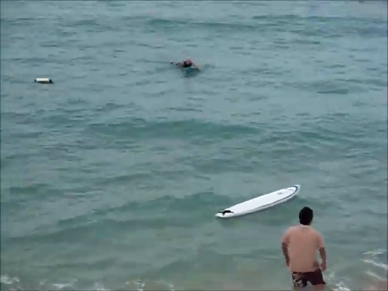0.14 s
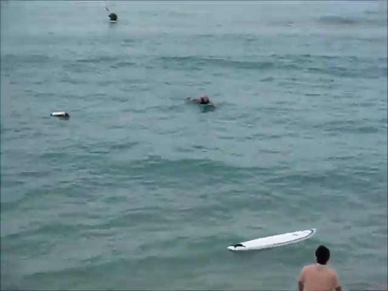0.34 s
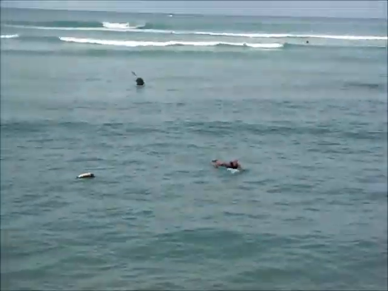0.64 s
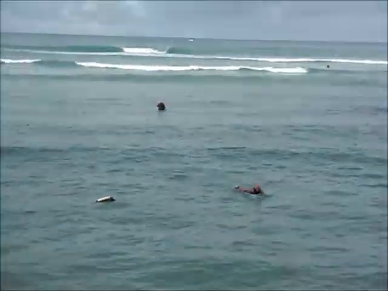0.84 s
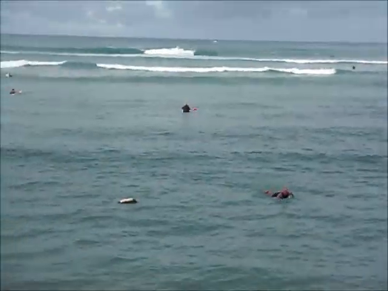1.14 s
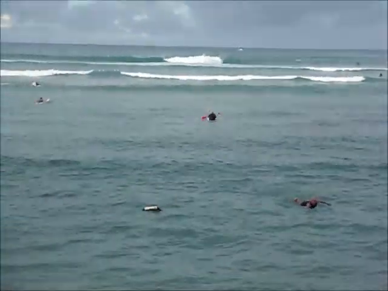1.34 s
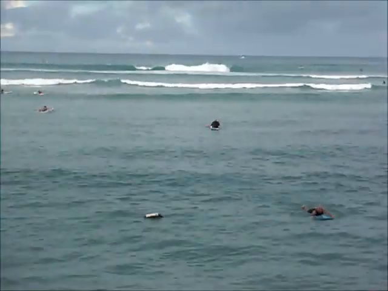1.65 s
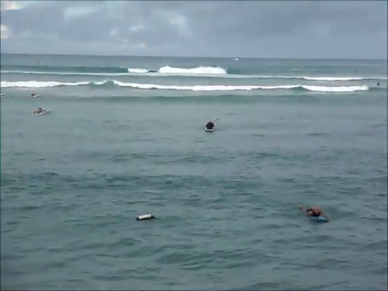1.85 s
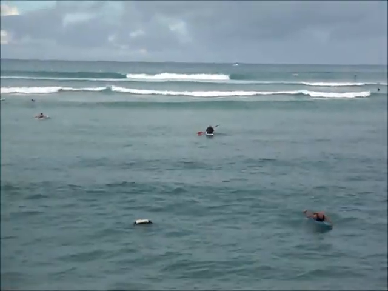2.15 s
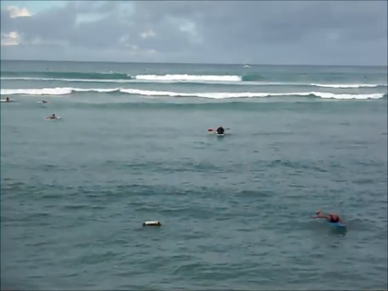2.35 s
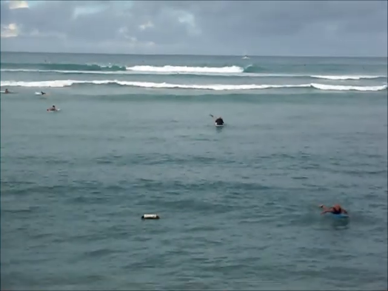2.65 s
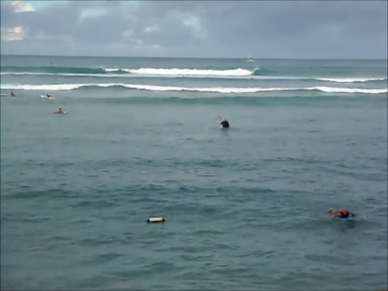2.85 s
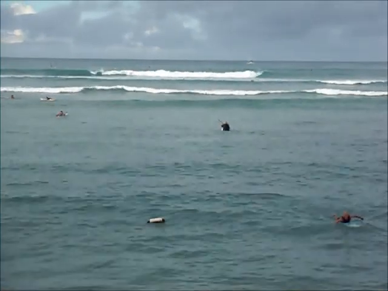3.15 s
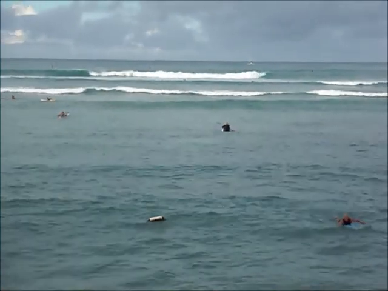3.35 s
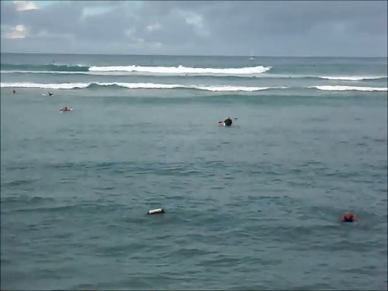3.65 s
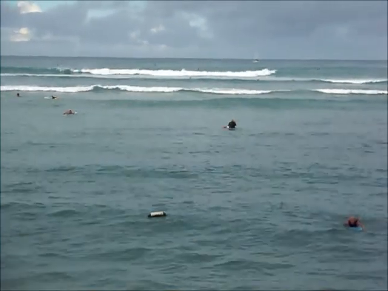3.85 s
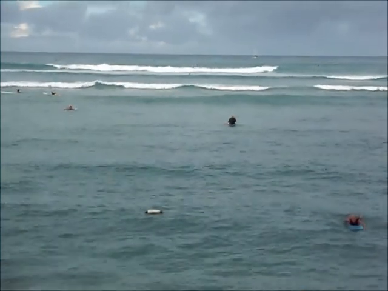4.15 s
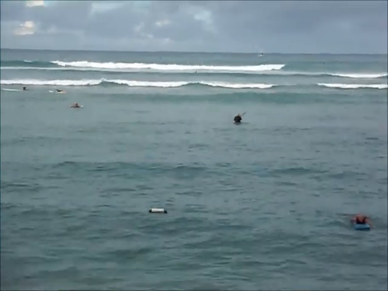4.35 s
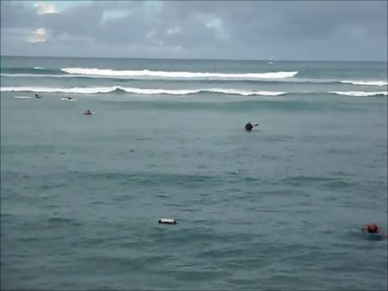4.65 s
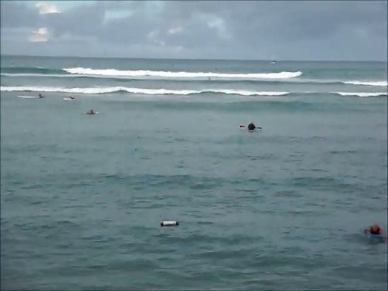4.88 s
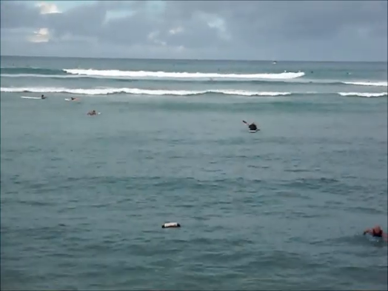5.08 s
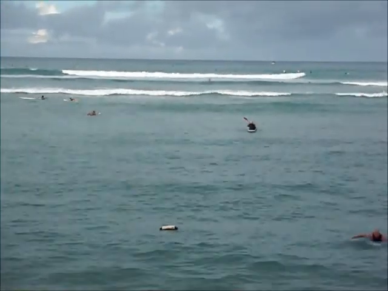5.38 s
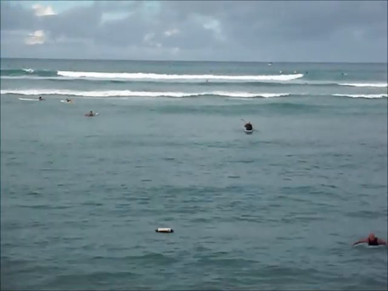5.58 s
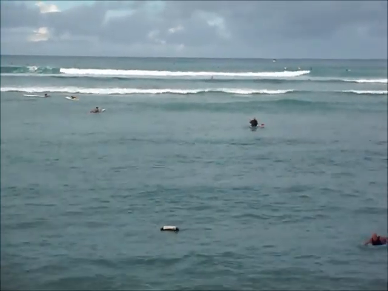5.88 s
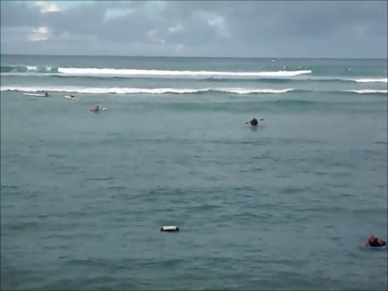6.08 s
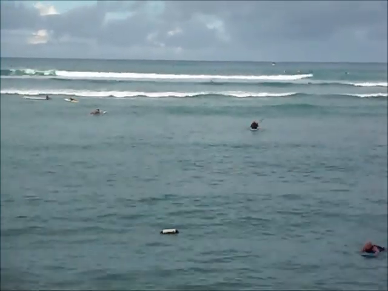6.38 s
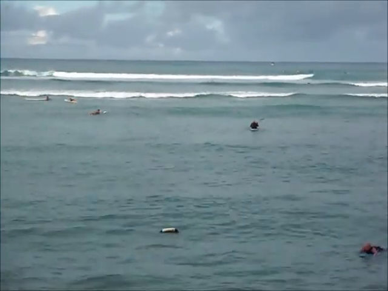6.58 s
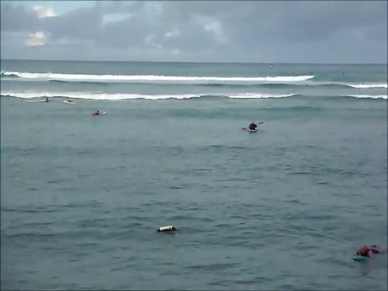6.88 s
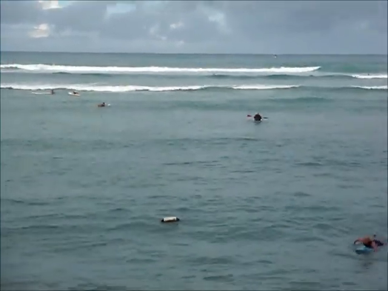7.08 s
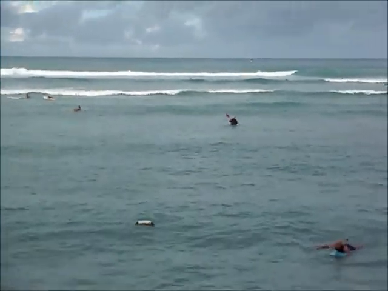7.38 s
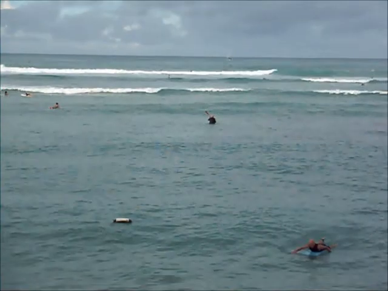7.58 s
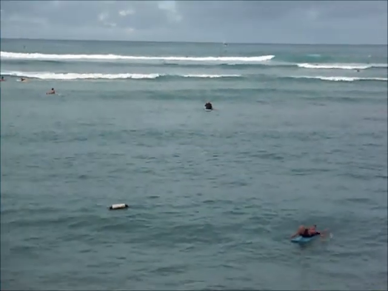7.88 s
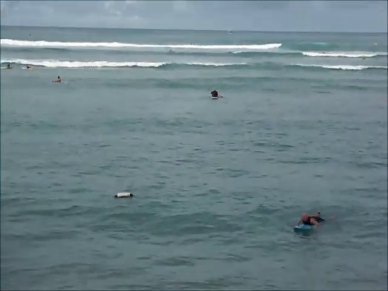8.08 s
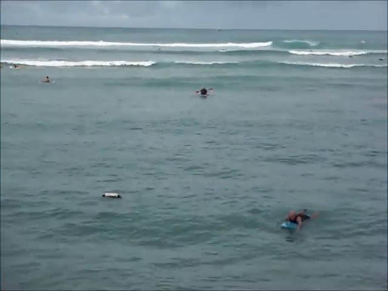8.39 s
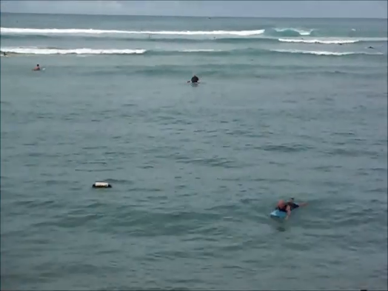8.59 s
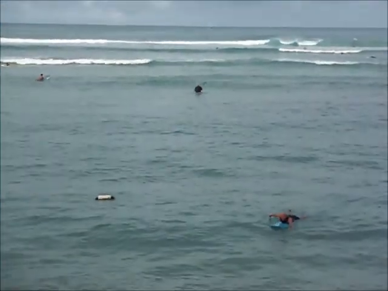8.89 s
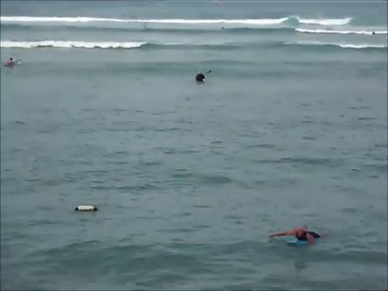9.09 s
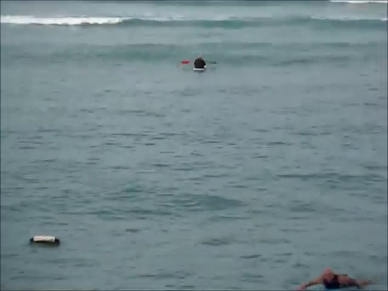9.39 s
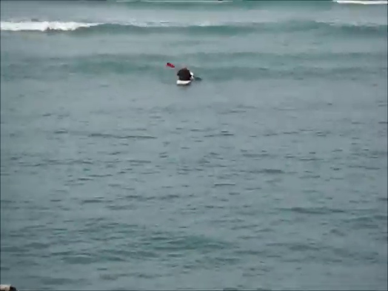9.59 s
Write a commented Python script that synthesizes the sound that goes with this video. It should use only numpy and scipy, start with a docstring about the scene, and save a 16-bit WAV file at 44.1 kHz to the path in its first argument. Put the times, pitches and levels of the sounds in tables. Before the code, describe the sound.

Small waves wash onto a beach, their foam making a steady, slightly hollow hiss that gently swells and fades. A faint low hum from inside the pocket camera comes about once a second. Near the end, fingers knock the case twice, and the surf briefly drops away after each knock. The zoom motor then ticks, chatters and whines right at the microphone, ending with a clack.

```python
"""Small waves wash on a beach, their foam hissing through a pocket camera's ringing microphone opening.
A low hum from inside the camera comes about once a second. Near the end, fingers knock the case,
the wash and hum dip after each loud knock, and the zoom motor ticks, chatters and whines
over a rushing noise."""
import sys
import numpy as np
from scipy import signal
from scipy.fft import rfft, irfft, next_fast_len
from scipy.io import wavfile
from scipy.ndimage import uniform_filter1d

SR = 44100
rng = np.random.default_rng(int(sys.argv[2]) if len(sys.argv) > 2 else 0)


def inscribe(sig):
    """Save sig as 16-bit PCM at rate SR to the path in sys.argv[1].

    A 1-D sig is mono; a 2-D sig holds one channel per row.
    Samples are clipped to [-1, 1] before scaling.
    """
    pcm = np.round(np.clip(np.atleast_2d(sig).T, -1, 1) * 32767)
    wavfile.write(sys.argv[1], SR, pcm.astype(np.int16))


N = 429093
T = np.arange(N) / SR

# Level of the wash: waves swelling and fading, then a rushing noise under the zoom motor: time_s, level_db
WASH_LEVELS = [(0, -21), (.8, -20), (1.3, -17.5), (2.1, -17), (2.75, -16.5), (3.05, -18.5), (3.6, -21.5),
               (4.43, -22.5), (4.499, -18.5), (4.75, -19), (5.0, -18.5), (5.95, -18.5), (6.1, -15.5),
               (6.28, -20.5), (6.6, -23), (7.45, -21), (7.8, -20.5), (8.1, -16), (8.45, -15), (8.8, -16),
               (9.0, -10), (9.73, -14.5)]
# Tone of the foam at the microphone: pitch_hz, relative_db
FOAM_TONE = [(12, -41.5), (20, -9), (60, -16.5), (196, -15), (241, -12), (520, -14.5), (930, -9.5),
             (1230, -18.5), (1350, -12), (1550, -15.5), (1830, -11.5), (2250, -1), (3500, -15.5),
             (4420, -22.5), (5200, -33), (6760, -68.5), (11400, -120)]
# Fingertip taps: start_s, strength_db, contact_ms
FINGER_TAPS = [(7.5409, -1.5, .3), (7.5526, 20, 0.11), (7.595, -33, 0.11), (7.631, -36, 0.11)]
# Zoom lever hits: start_s, clack_db, thud_db, direction
LEVER_HITS = [(8.001, -40, -13.5, 1), (8.8049, 4.5, -10.5, 0.97), (9.641, -1.5, -21.5, -0.94)]
# Ringing notes of the case, lever and lens barrel: pitch_hz, relative_db, fade_s (to fall 60 dB)
CASE_NOTES = [(956, -11, 0.011), (1390, 0.5, 0.014), (1724, -7.5, 0.012), (2300, -12, 0.0097),
              (3720, -19, 0.0063), (4550, -20, 0.008)]
LEVER_NOTES = [(410, -3, 0.008), (770, -5.5, 0.016), (1248, 0.5, 0.013), (1650, -8.5, 0.011),
               (2240, -10, 0.0069), (3500, -2, 0.0063), (4270, -5.5, 0.0053)]
BARREL_NOTES = [(887, -5, 0.018), (1365, 2.5, .014), (1900, 3, 0.01), (2383, 6, 0.016)]
# Lone gear ticks: start_s, strength_db
GEAR_TICKS = [(8.9588, -4), (8.9785, -13), (8.983, -18), (9.0924, -11), (9.1604, -15), (9.1918, -17),
              (9.1978, -8), (9.2175, -20), (9.267, -19), (9.286, -14), (9.4355, -17), (9.4498, -6)]
# Motor runs: start_s, end_s, whine_cycles_per_step, step_db, whine_db, load_jump_s
MOTOR_RUNS = [(8.956, 9, 12, -27, -49, 12), (8.999, 9.086, 8, -15.5, -35, 9.0082),
              (9.103, 9.317, 12, -22, -46, 9.2), (9.311, 9.409, 12, -13.5, -31, 9.3352),
              (9.408, 9.45, 8, -33, -43, 9.42), (9.457, 9.476, 8, -19, -34, 9.4793),
              (9.477, 9.6195, 8, -11, -34.5, 9.5032)]
# Bursts of hum: start_s, length_s, level_db
HUM_BURSTS = [(0.612, .32, -32.5), (1.646, 0.28, -31), (2.65, 0.3, -32.5), (3.583, 0.34, -32),
              (4.595, 0.32, -32.5), (5.623, 0.31, -32.5), (6.63, .35, -33), (7.62, 0.26, -37),
              (8.643, 0.21, -30)]
# Dips after loud knocks: start_s, depth_db, hold_until_s
LEVEL_DIPS = [(7.559, -25.5, 7.635), (8.806, -22.5, 9.8)]


def wash():
    """Bursting bubbles make a rough hiss that swells with the waves; it ends as a rush under the motor."""
    calm_db, bass_lag, treble_lag = -20, .55, .35
    wash_db = np.interp(T, *np.transpose(WASH_LEVELS))
    size = next_fast_len(N)
    hz = np.maximum(np.fft.rfftfreq(size, 1 / SR), 1)
    tone_hz, tone_db = np.transpose(FOAM_TONE)
    tone = gain(np.interp(np.log(hz), np.log(tone_hz), tone_db))
    tone *= gain(2.7 * np.exp(-((hz - 3484) / 250) ** 2))  # the microphone opening's second ring
    bubbles = gain(1.5 * rng.exponential(size=N)) * gain(.57 * wobble(70))
    spectrum = rfft(rng.standard_normal(N) * bubbles, size) * tone
    octave, foam = np.log2(hz / 1000), 0
    for centre in np.arange(-6, 3, .5):  # octaves from 1000 Hz
        window = np.cos(np.pi * np.clip(octave - centre, -.5, .5)) ** 2
        band = irfft(spectrum * window, size)[:N]
        # bass and treble swell less than the middle
        lag = bass_lag if centre < .6 else treble_lag if centre > 1.6 else 0
        foam += band * gain(-lag * (wash_db - calm_db) + .56 * wobble(12))
    return unit(foam) * gain(wash_db + .071 * wobble(6))


def knocks():
    """A finger scrapes and taps the plastic case; the zoom lever clacks and thuds the whole body."""
    taps = sum(push(s, db, ms) for s, db, ms in FINGER_TAPS)
    rubbing = gain(-31.5) * gate(7.514, 7.546, .004) * rng.standard_normal(N)
    scrape = ring(rubbing, CASE_NOTES[1:2])  # soft skin stirs only the main note
    clacks = sum(way * push(s, db, contact_ms=.25) for s, db, _, way in LEVER_HITS)
    thuds = sum(way * push(s, db, contact_ms=3.4) for s, _, db, way in LEVER_HITS)
    body = ring(thuds, notes=[(88, 0, .042)])
    return ring(taps, CASE_NOTES) + scrape + ring(clacks, LEVER_NOTES) + body


def zoom_motor():
    """A whining motor moves in tiny steps that click the gear teeth and shake the lens barrel."""
    whine_hz, cycles_per_turn, step_spread_db = 2343.6, 80, 2.8
    clicks = sum(push(s, db, contact_ms=.043) for s, db in GEAR_TICKS)
    whine = rattle = 0
    for start, end, cycles, step_db, whine_db, jump_s in MOTOR_RUNS:
        step_hz = whine_hz / cycles
        times = jump_s + np.arange(np.ceil((start - jump_s) * step_hz), (end - jump_s) * step_hz) / step_hz
        level_jitter, time_jitter = rng.standard_normal((80, 2))[:len(times)].T
        # once per gear turn the load jumps, then eases
        turn = (whine_hz / cycles_per_turn * (times - jump_s) + .01) % 1
        load_db = 8 * (np.exp(-turn / .091) - .3)
        click_db = step_db + load_db + step_spread_db * np.clip(level_jitter, -1.6, 1.6)
        samples = np.round((times + .00001 * time_jitter) * SR).astype(int)
        np.add.at(clicks, samples, gain(click_db))
        whine += gain(whine_db) * gate(start, end, .0032) * np.sin(2 * np.pi * whine_hz * (T - jump_s))
        rattle += gain(step_db) * gate(start, end, .003)
    # loose teeth chatter between the steps
    chatter = rattle * rng.standard_normal(N) * gain(3 * wobble(120))
    teeth = keep_band(clicks + gain(-29.5) * chatter, hz=(3920, 4890), order=3)
    barrel = ring(clicks + gain(-22.5) * chatter, BARREL_NOTES)
    barrel = keep_band(barrel, hz=600, order=2, kind="highpass")
    whine *= gain(1.2 * wobble(30)) * np.sqrt(2)
    return gain(23.5) * teeth + gain(-16.5) * barrel + whine


def camera_hum():
    """The camera hums from inside in rough, low bursts, strongest near 85 Hz."""
    noise = rng.standard_normal(N)
    narrow = keep_band(noise, hz=(70, 102), order=2)
    wide = keep_band(noise[::-1], hz=(45, 190), order=1)
    bursts = sum(gain(db) * gate(s, s + length, .018) for s, length, db in HUM_BURSTS)
    return unit(unit(narrow) + 1.2 * unit(wide)) * bursts


def dips(fall_s=.012, rise_db_per_s=232):
    """At each listed time the level drops fast, stays low, then climbs back steadily."""
    db = 0
    for start, depth_db, until in LEVEL_DIPS:
        fall = depth_db * (1 - np.exp(-np.maximum(T - start, 0) / fall_s))
        rise = rise_db_per_s * np.maximum(T - until, 0)
        db += np.minimum(fall + rise, 0)
    return gain(db)


def push(start_s, db, contact_ms):
    """One short, smooth push; db sets its total strength."""
    phase = (T - start_s) / (contact_ms / 1000)
    force = np.where((phase > 0) & (phase < 1), np.sin(np.pi * phase), 0)
    return gain(db) * force / force.sum()


def ring(hits, notes):
    """Each hit starts fading notes; neighbouring notes swing opposite ways."""
    t, body = T[:SR // 10], 0
    for k, (hz, db, fade_s) in enumerate(notes):
        direction = (-1) ** (len(notes) - 1 - k)
        body += direction * gain(db - 60 * t / fade_s) * np.sin(2 * np.pi * hz * t)
    return signal.fftconvolve(hits, body)[:N]


def wobble(rate_hz):
    """A smooth random drift of typical size 1."""
    hold = int(SR / rate_hz)
    steps = np.repeat(rng.standard_normal(N // hold + 1), hold)
    return unit(uniform_filter1d(uniform_filter1d(steps, hold), hold)[:N])


def keep_band(x, hz, order, kind="bandpass"):
    """Let only some pitches through."""
    return signal.sosfilt(signal.butter(order, hz, kind, fs=SR, output="sos"), x)


def gate(start_s, end_s, fade_s):
    """Fade on, hold at 1, fade off."""
    return np.clip(np.minimum(T - start_s, end_s - T) / fade_s + .5, 0, 1)


def gain(db):
    """Turn decibels into a multiplier."""
    return 10 ** (np.asarray(db) / 20)


def unit(x):
    """Scale to an average (rms) level of 1."""
    return x / np.sqrt(np.mean(x ** 2))


def scene():
    """The wash and hum dip under the knocks and the motor."""
    return ((wash() + camera_hum()) * dips() + knocks() + zoom_motor())[None]


def record(dry):
    """The camera clips loud peaks, adds hiss and a tiny offset, and cuts the treble."""
    hiss_db, offset, treble_cut_hz, top_hz = -48.5, -.004, 5280, 16000
    noisy = np.clip(dry, -1.15, 1.15) + gain(hiss_db) * rng.standard_normal(N) + offset
    dull = signal.sosfilt(signal.ellip(9, .5, 90, treble_cut_hz, fs=SR, output="sos"), noisy)
    clipped = np.clip(dull, -1, 1)  # peaks that overshoot clip again
    return signal.sosfilt(signal.ellip(8, .2, 70, top_hz, fs=SR, output="sos"), clipped)


dry = scene()
out = record(dry)
inscribe(out)
```